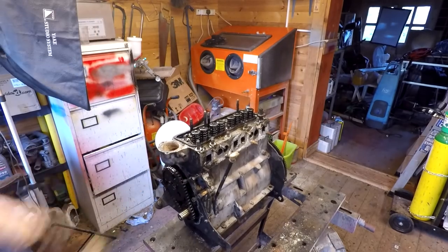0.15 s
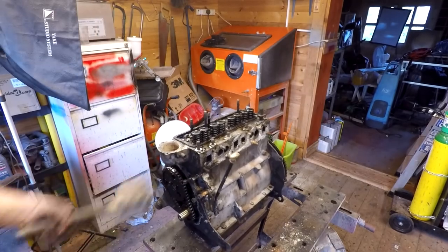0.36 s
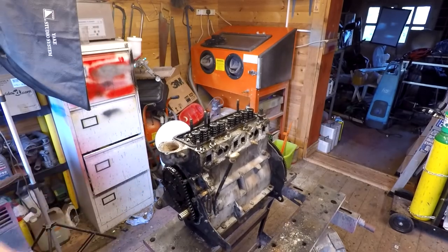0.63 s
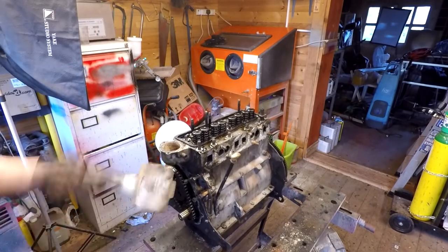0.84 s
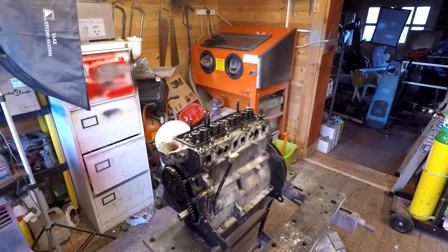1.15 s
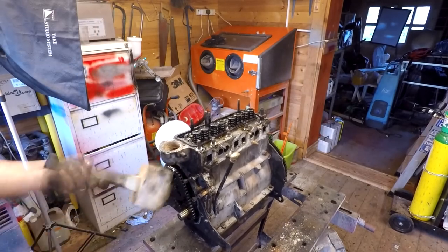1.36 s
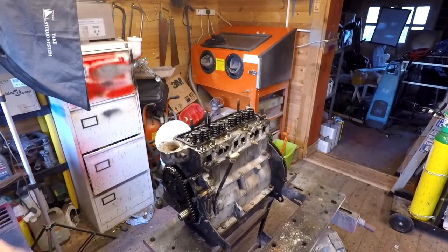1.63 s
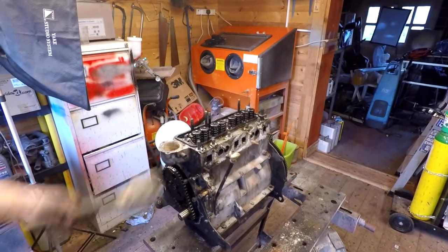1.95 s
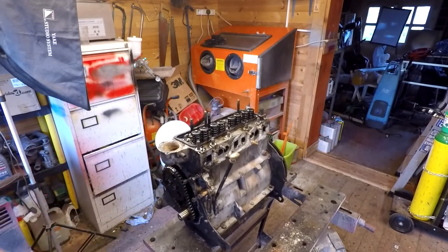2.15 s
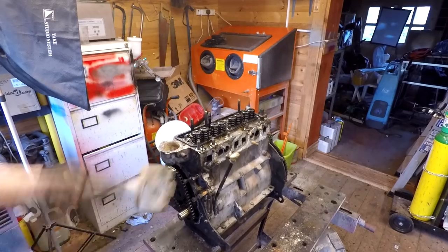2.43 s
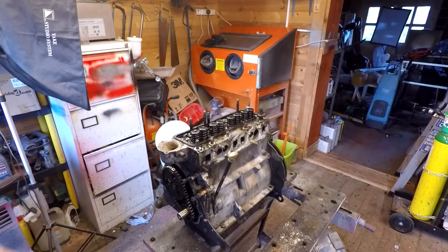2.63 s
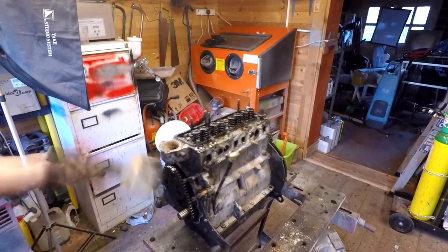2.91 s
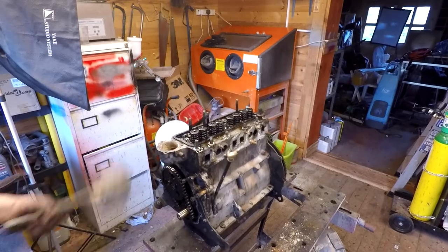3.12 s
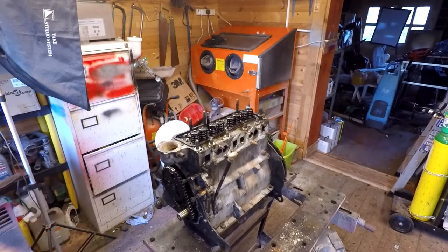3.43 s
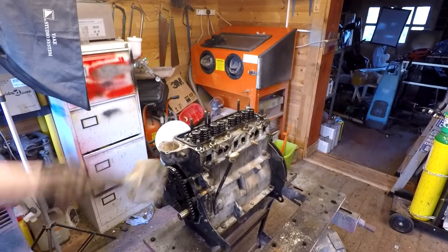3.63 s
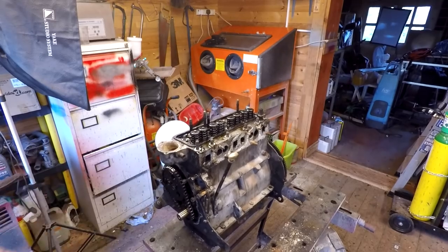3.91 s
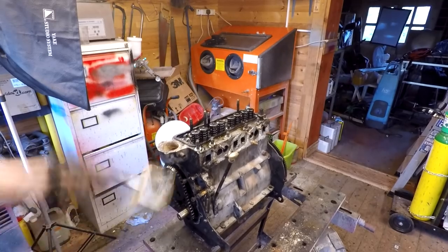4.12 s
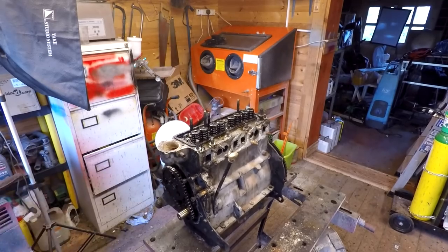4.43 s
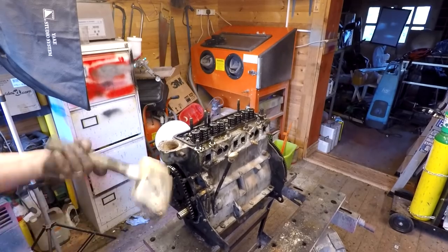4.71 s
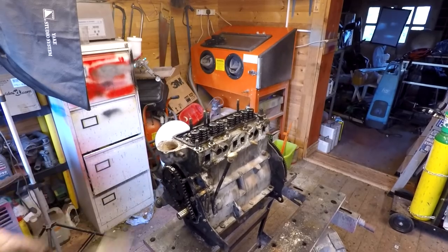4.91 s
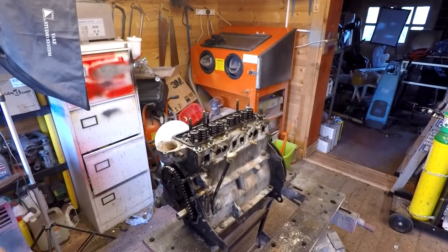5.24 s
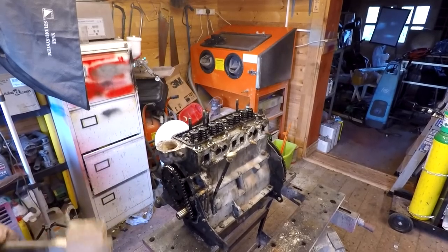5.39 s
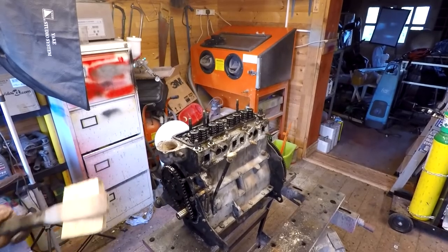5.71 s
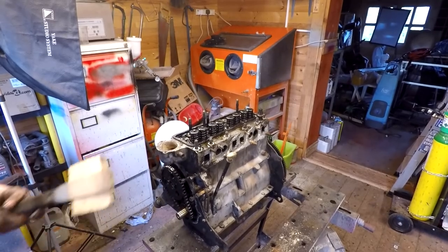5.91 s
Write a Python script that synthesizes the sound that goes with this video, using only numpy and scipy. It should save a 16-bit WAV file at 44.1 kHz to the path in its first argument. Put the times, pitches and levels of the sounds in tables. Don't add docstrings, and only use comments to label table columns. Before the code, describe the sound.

Loud, slightly overloaded mallet knocks on heavy cast metal in a small wooden workshop, ending with a bench tap and a bouncing mallet drop.

```python
import sys
import numpy as np
from scipy import signal
from scipy.io import wavfile
from scipy.ndimage import uniform_filter1d

SR = 44100
rng = np.random.default_rng(int(sys.argv[2]) if len(sys.argv) > 2 else 0)


def unload_audio(sound):
    columns = np.transpose(np.atleast_2d(sound))
    steps = np.round(np.clip(columns, -1, 1) * 32767)
    wavfile.write(sys.argv[1], SR, steps.astype(np.int16))


def attenuation_scalar(level_db):
    decades = np.asarray(level_db, float) / 20
    return 10 ** decades


N = 267246


def rms_one(x):
    return x / np.sqrt(np.mean(x ** 2) + 1e-20)


def at_hz(points, hz, column=1):
    points = np.array(points)
    return np.interp(np.log(hz), np.log(points[:, 0]), points[:, column])


def bands(size):
    edges = 20 * 2 ** (np.arange(30) / 3)
    warm_up = 4000
    white = rng.standard_normal((2, size + warm_up))
    for k, (low, high) in enumerate(zip(edges, edges[1:])):
        sos = signal.butter(2, [low, high], "band", fs=SR, output="sos")
        yield np.sqrt(low * high), rms_one(signal.sosfilt(sos, white[k % 2])[warm_up:])


def ring(push, hz, t60):
    r, w = attenuation_scalar(-60 / (t60 * SR)), 2 * np.pi * hz / SR
    return signal.lfilter([0, np.sin(w)], [1, -2 * r * np.cos(w), r * r], push + 1e-18)


# (frequency [Hz], level per third octave [dB])
FLOOR = [(25, -61.5), (40, -69), (90, -68.5), (160, -75), (300, -76), (700, -78.5), (1300, -78.5),
         (2200, -85.5), (5000, -85.5), (10000, -89), (15000, -99.5)]
# (start [s], length [s], floor lift [dB])
SWINGS = [
    (0, .26, 4),
    (0.751, .09, -2),
    (1.8, .1, 8.5),
    (2.802, .14, 3),
    (3.18, .14, 5),
    (3.505, .12, 9.5),
    (4.04, .12, 5),
    (5.837, .2, 7),
]


def floor():
    t = np.arange(N) / SR
    rise_s, fall_s = 0.014, 0.06
    lift_db = -1
    for start, length, db in SWINGS:
        corners = [start - rise_s, start, start + length, start + length + fall_s]
        lift_db = lift_db + db * np.interp(t, corners, [0, 1, 1, 0])
    lumps_db = 1.8 * rms_one(uniform_filter1d(rng.standard_normal(N), size=3000))
    # (frequency [Hz], share of the swell)
    swing = [(40, 0.3), (300, 0.24), (900, 1.3), (1400, 1.4), (2200, 0.7), (6000, 0.6), (12000, 0.1)]
    out = np.zeros(N)
    for hz, noise in bands(N):
        out += attenuation_scalar(at_hz(FLOOR, hz) + at_hz(swing, hz) * (lift_db + lumps_db)) * noise
    return out


# (start [s], length [s], start pitch [Hz], end pitch [Hz], level [dB])
BIRDS = [
    (0.038, .07, 6200, 6050, -74.5),
    (0.507, 0.16, 5400, 5220, -69),
    (2.193, .06, 4970, 5360, -73),
    (2.283, .05, 6540, 6750, -79),
    (2.695, .14, 6200, 4960, -73),
]


def birds():
    out = np.zeros(N)
    for start, length, start_hz, end_hz, db in BIRDS:
        n = round(length * SR)
        waver_hz = 50 * rms_one(uniform_filter1d(rng.standard_normal(SR), size=200))[:n]
        phase = 2 * np.pi * np.cumsum(np.geomspace(start_hz, end_hz, n) + waver_hz) / SR
        flutter = 1 + 0.37 * rng.standard_normal(n // 40 + 1).repeat(40)[:n]
        at = round(start * SR)
        out[at:at + n] += attenuation_scalar(db) * np.sin(phase) * flutter * np.hanning(n) ** 0.36
    return out


def earlier_blow():
    return attenuation_scalar(-59) * ring((np.arange(N) == 0) + 0.0, 917, 0.8)


# (frequency [Hz], level [dB], t60 [s])
ROOM = [(30, -25.5, 0.63), (75.6, -15, 0.14), (162, -14, 0.32), (370, -5.5, 0.31), (920, 0, .28),
        (1520, -6.5, 0.28), (2460, -1, 0.25), (4200, -3.5, 0.25), (6020, -13, 0.27), (9800, -22, 0.19),
        (15300, -7, 0.22)]


def workshop(wet_db, build_s, alike, count):
    size = 30000
    t, tails = np.arange(size) / SR, 0
    for hz, noise in bands(size * (count + 1)):
        fade_db = at_hz(ROOM, hz) - 60 * t / at_hz(ROOM, hz, column=2)
        tails = tails + attenuation_scalar(fade_db) * np.sqrt(hz / SR) * noise.reshape(count + 1, size)
    nearest_walls = 1 + 0.21 * np.exp(-t / 0.012)
    shape = (1 - np.exp(-t / build_s)) * nearest_walls
    return attenuation_scalar(wet_db) * shape * (np.sqrt(alike) * tails[0] + np.sqrt(1 - alike) * tails[1:])


def ring_all(push, modes, spread_db):
    strength = attenuation_scalar(spread_db * rng.standard_normal(len(modes))) * rng.choice([-1, 1], len(modes))
    return sum(g * attenuation_scalar(db) * ring(push, hz, t60) for g, (hz, db, t60) in zip(strength, modes))


def face_chatter():
    t = np.arange(1000) / SR
    return attenuation_scalar(-17) * rng.standard_normal(1000) * np.exp(-t / 0.0012) * t / 0.001


# (frequency [Hz], level [dB], t60 [s])
STAND = [(28.4, -19.5, 1), (77.5, -5.5, 0.27), (89.4, -3, 0.28), (112.3, -10.5, 0.26), (154, -11, .4)]
# (frequency [Hz], level [dB], t60 [s])
SHEETS = [(310, -52, .7), (610, -60.5, 0.86), (923, -51.5, 1.6), (1060, -51, .45), (1440, -62, 1.7)]


def strikes(events, body, body_db, knock_db, near_db, base_crack_db, thump_db, chatter_db, echoes):
    out, t = np.zeros(N + SR), np.arange(SR) / SR
    impulse = (t == 0) + 1e-18
    rock = attenuation_scalar(-16) + 1 / (1 + np.exp((0.055 - t) / 0.0083))
    bright = signal.butter(2, [2000, 7000], "band", fs=SR, output="sos")
    airy = signal.butter(2, [9000, 16000], "band", fs=SR, output="sos")
    sizzle = attenuation_scalar(-8) * signal.sosfilt(airy, impulse)
    for (start, db, hardness), echo in zip(events, echoes):
        crack_db = base_crack_db + 12.5 * hardness
        contact_hz = np.clip(1000 * 2 ** hardness, 100, 15000)
        click = signal.sosfilt(signal.butter(2, contact_hz, fs=SR, output="sos"), impulse)
        crack = attenuation_scalar(crack_db) * signal.sosfilt(bright, impulse)
        knock = attenuation_scalar(knock_db) * (click + crack)

        rattle_tone = attenuation_scalar(knock_db) * (crack + attenuation_scalar(crack_db) * sizzle + attenuation_scalar(chatter_db) * click)
        chatter = np.pad(face_chatter(), (0, SR - 1000))
        near = attenuation_scalar(near_db) * knock + signal.lfilter(rattle_tone[:80], [1], chatter)
        room = np.pad(signal.fftconvolve(knock[:1000], echo, "full"), (0, SR))[:SR]

        onset = 1 - np.exp(-t / 0.00095)
        struck = attenuation_scalar(body_db) * ring_all(click, body, spread_db=2.0) * onset
        thump = attenuation_scalar(thump_db - 17) * rock * ring_all(click, STAND, spread_db=5.0)
        sheets = ring_all(click, SHEETS, spread_db=2.5)
        at = round(start * SR)
        out[at:at + SR] += attenuation_scalar(db) * (near + room + struck + thump + sheets)
    return out[:N]


# (frequency [Hz], level [dB], t60 [s])
BENCH = [(156, -4.5, 0.19), (202.2, -6, 0.27), (257.8, -10, 0.26), (306, -8.5, 0.35), (385.5, 1, 0.1),
         (429, -2.5, 0.15), (500, -8, 0.25), (685, -14.5, 0.059), (767, -9.5, 0.056), (830, -9, 0.097),
         (1210, -9.5, 0.071), (1610, -15, 0.22)]
# (time [s], strength [dB], contact hardness [octaves above 1 kHz])
TAP = [
    (4.998, -28.5, 1.4),
]


def bench_tap(echoes):
    return strikes(TAP, BENCH, body_db=-1.5, knock_db=35, near_db=-12.5, base_crack_db=-27.5,
                   thump_db=4.5, chatter_db=7.5, echoes=echoes)


# (time [s], strength [dB], contact hardness [octaves above 1 kHz])
DROPS = [(5.401, 1, -0.17), (5.652, -18, -0.5), (5.673, -10.5, 0.03), (5.689, -20, 0.15),
         (5.711, -30, -3.5), (5.719, -40, -0.4), (5.733, -26.5, -0.54), (5.769, -28, -0.6),
         (5.827, -17.5, -1.53), (5.849, -24, -2), (5.89, -19.5, -2.5), (5.915, -38.5, -2.4)]


def mallet_drop(echoes):
    return strikes(DROPS, BENCH, body_db=-3.0, knock_db=35.5, near_db=-19, base_crack_db=-34.5,
                   thump_db=-0.5, chatter_db=-13.5, echoes=echoes)


# (frequency [Hz], level [dB], t60 [s])
HEAD = [(262.5, -6.5, 0.27), (348, -8.5, 0.25), (446, -12, 0.36), (631, -3, 0.12), (683.5, -2.5, .3),
        (866, -5, 0.1), (897, -3.5, .2), (1013, -6, 0.23), (1061, -0.5, .26), (1150.5, -0.5, 0.27),
        (1206, -6.5, 0.24), (1284, -6.5, .19), (1403, -10.5, 0.15), (1530, -8, 0.17), (1690, -10, .18),
        (2230, -11.5, 0.35), (2590, -11.5, 0.23), (3200, -9.5, 0.29)]
# (time [s], strength [dB], contact hardness [octaves above 1 kHz])
BLOWS = [
    (0.2797, -0.5, 1.22),
    (0.8408, -3, 1.405),
    (0.8862, -19, 1.5),
    (1.395, -2, 1.01),
    (1.9013, -0.56, 0.94),
    (2.4298, -1.5, 1.14),
    (2.9549, -5, 1.08),
    (3.619, -2, 1.216),
    (4.1736, -1, 1.494),
    (4.7326, -3.5, 1.42),
]


def head_blows(echoes):
    return strikes(BLOWS, HEAD, body_db=-11, knock_db=31, near_db=-16, base_crack_db=-28,
                   thump_db=-2.0, chatter_db=-23.5, echoes=echoes)


def scene():
    echoes = workshop(wet_db=-24.5, build_s=0.00043, alike=0.65, count=7)
    echoes = np.tile(echoes, (3, 1))
    background = floor() + birds() + earlier_blow()
    contacts = bench_tap(echoes[3:]) + mallet_drop(echoes[4:]) + head_blows(echoes)
    return (background + contacts)[None]


def roll_off(x):
    return signal.sosfilt(signal.butter(12, 16820, fs=SR, output="sos"), x)


def record(dry):
    bass_cut = signal.butter(1, 25, "high", fs=SR, output="sos")
    clipped = np.clip(signal.sosfilt(bass_cut, dry), -0.575, 0.575)
    top_cut = signal.cheby2(10, 50, 16800, fs=SR, output="sos")
    mix = signal.sosfilt(top_cut, clipped)
    return roll_off(mix)


dry = scene()
out = record(dry)
unload_audio(out)
```